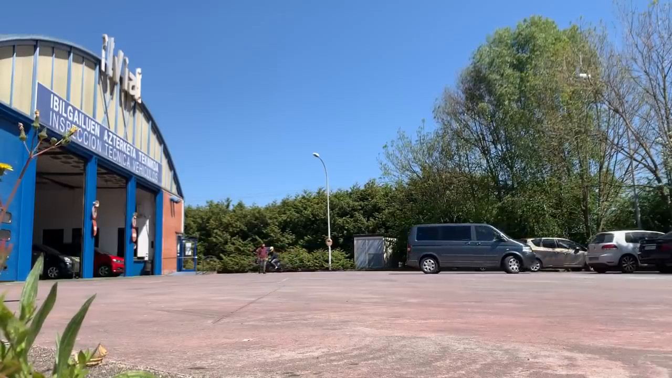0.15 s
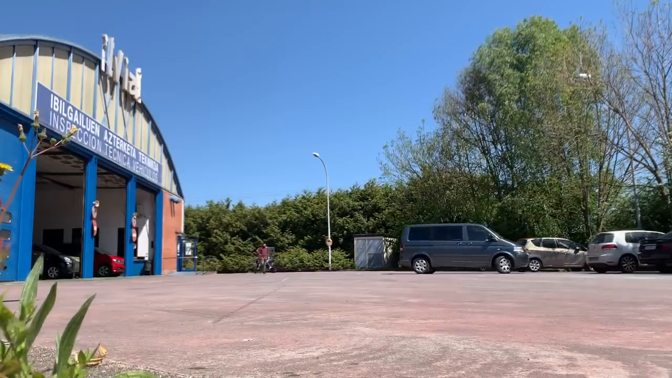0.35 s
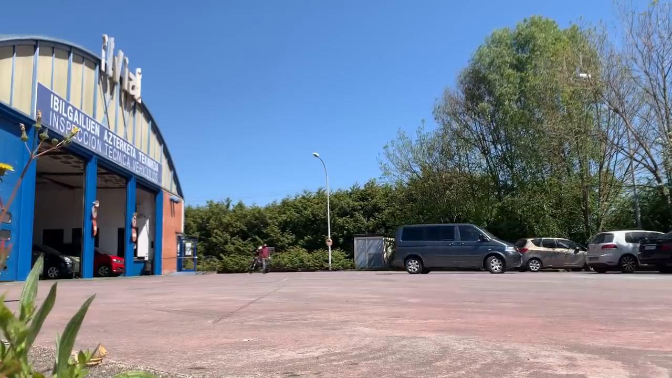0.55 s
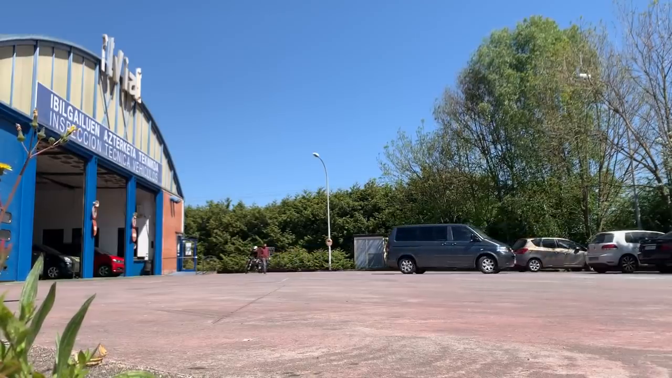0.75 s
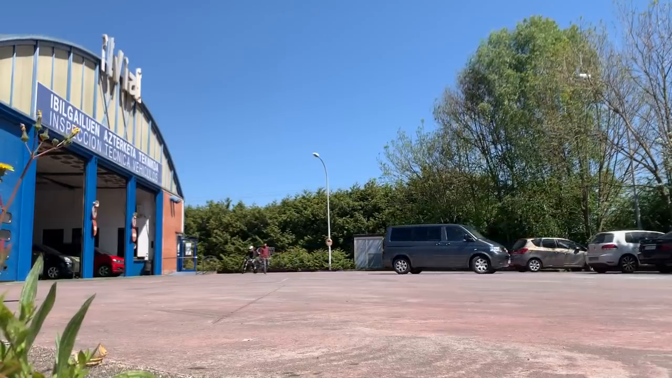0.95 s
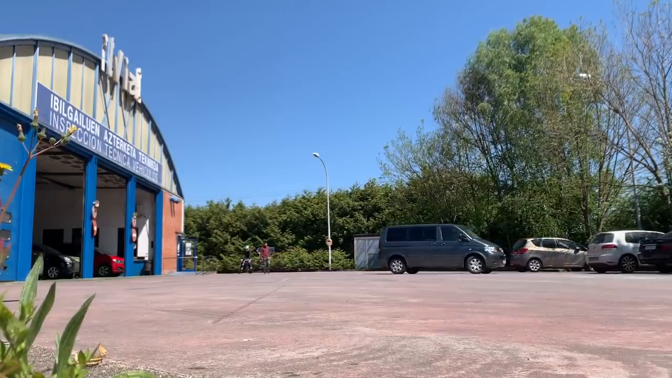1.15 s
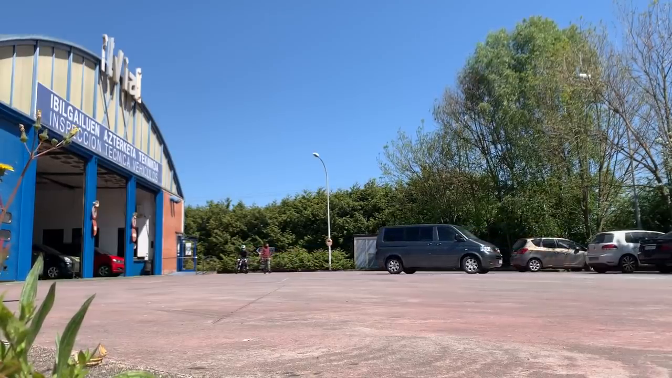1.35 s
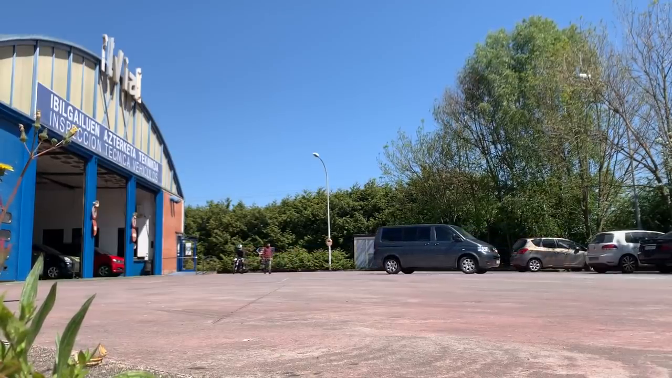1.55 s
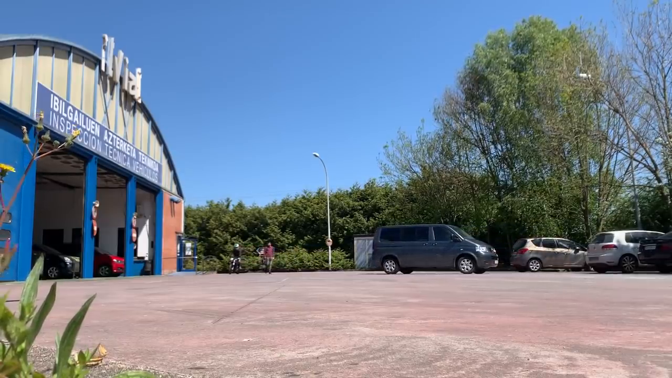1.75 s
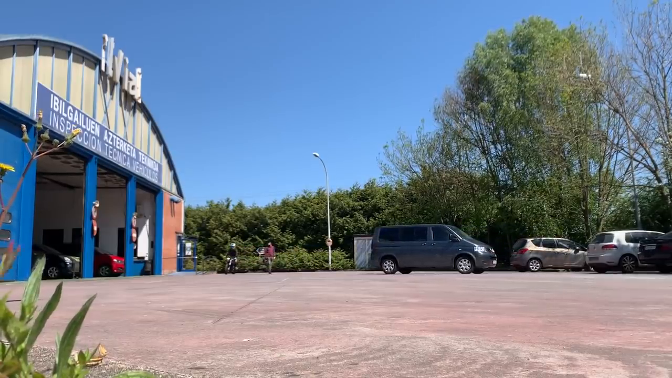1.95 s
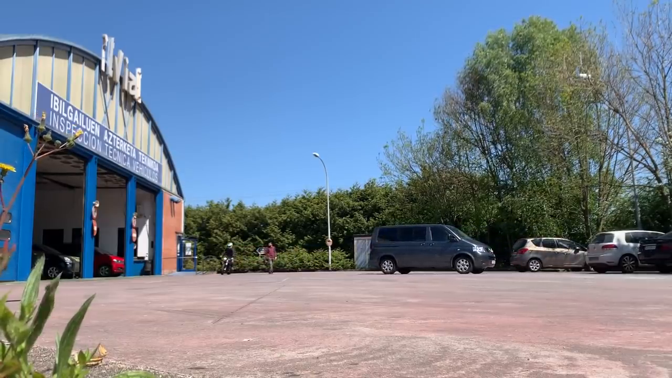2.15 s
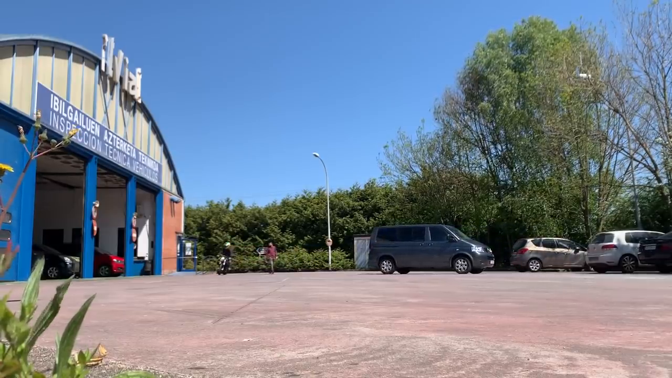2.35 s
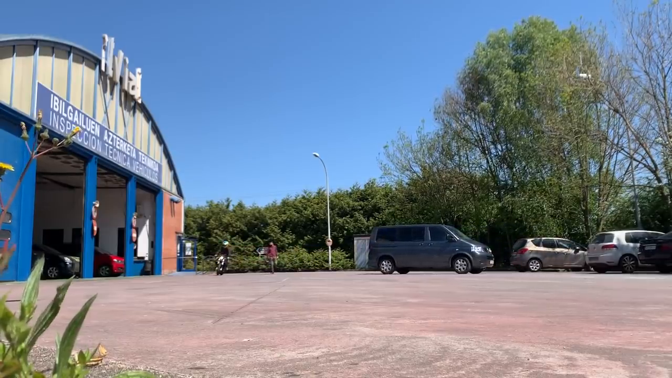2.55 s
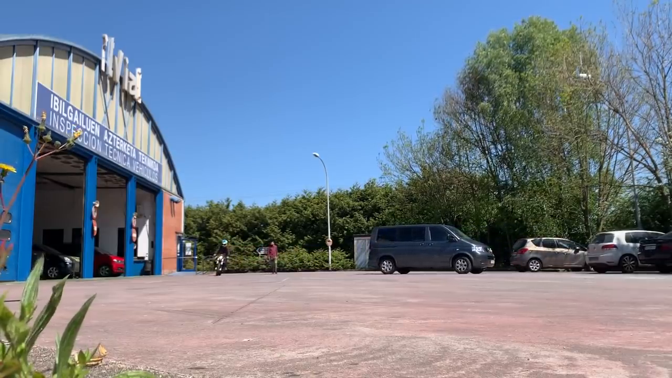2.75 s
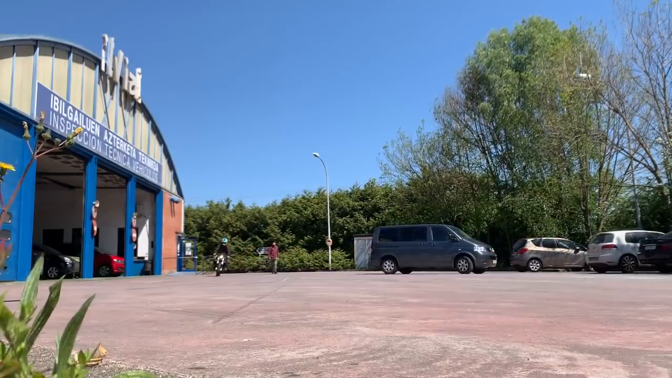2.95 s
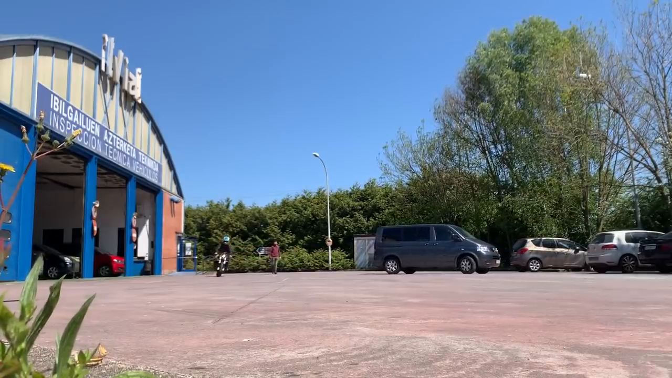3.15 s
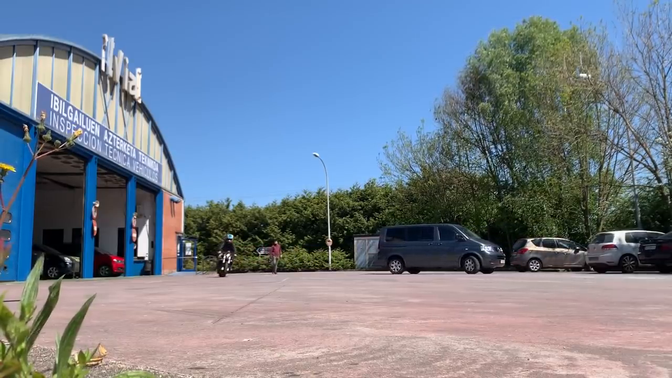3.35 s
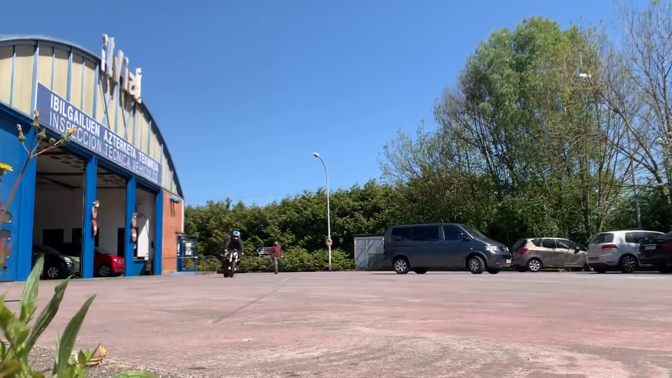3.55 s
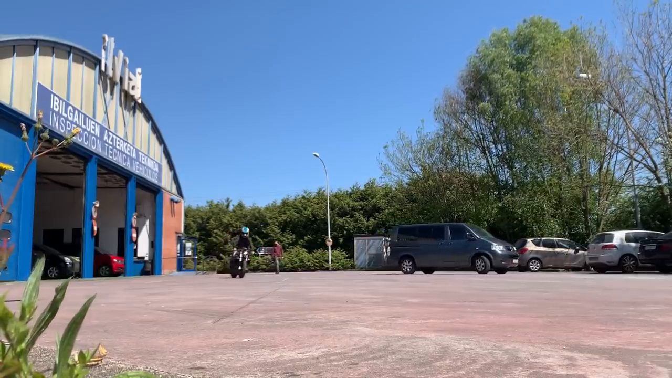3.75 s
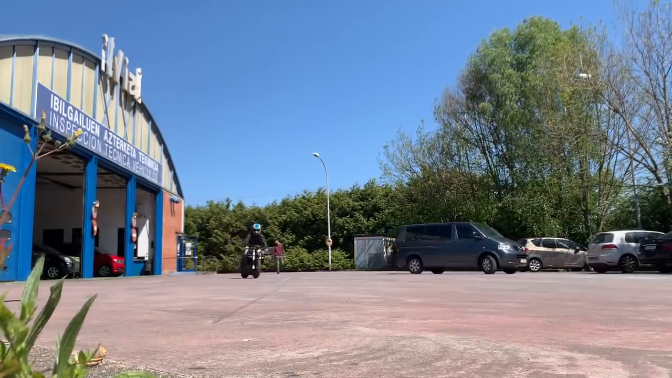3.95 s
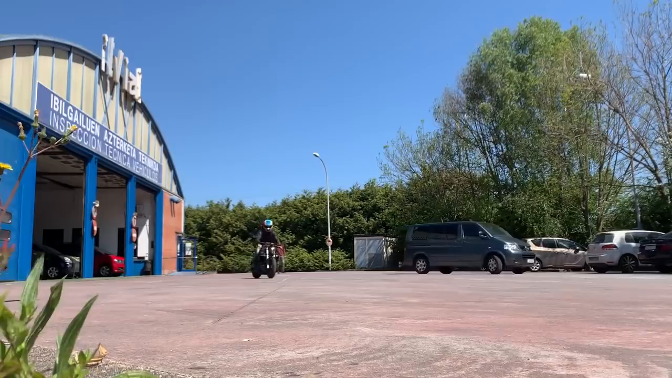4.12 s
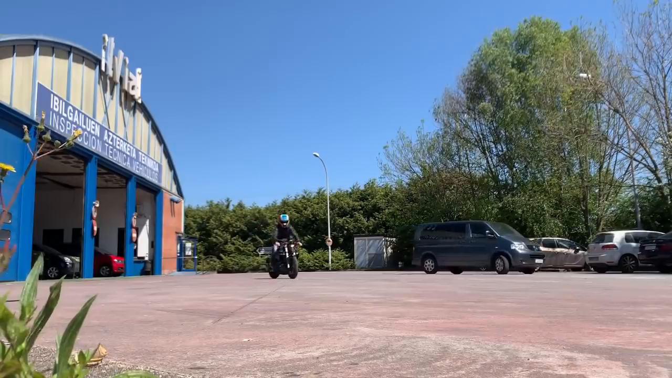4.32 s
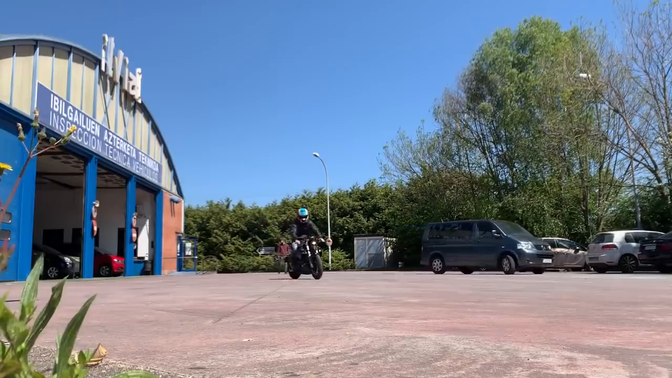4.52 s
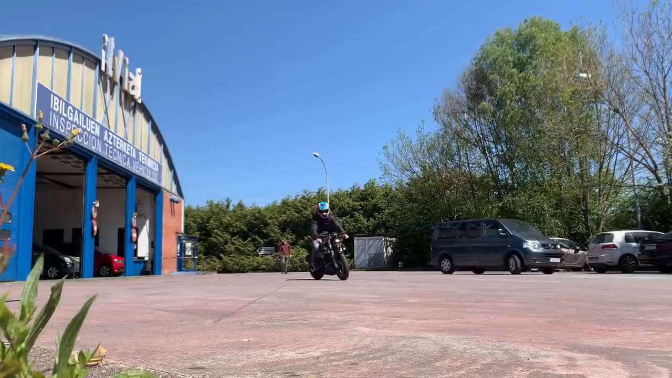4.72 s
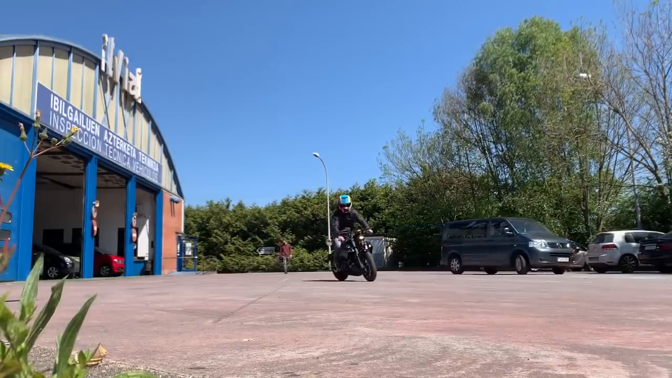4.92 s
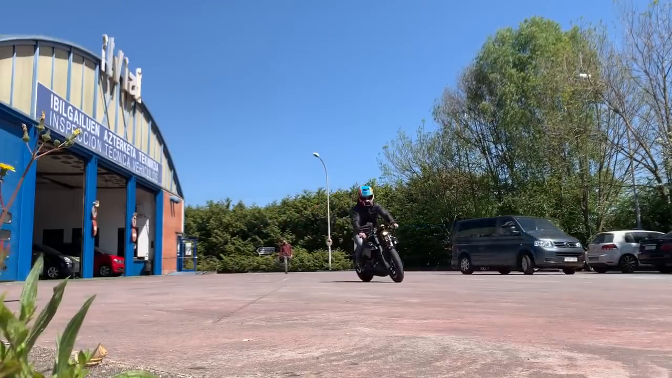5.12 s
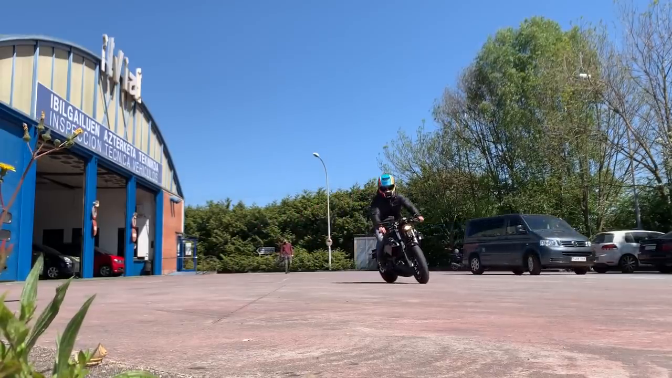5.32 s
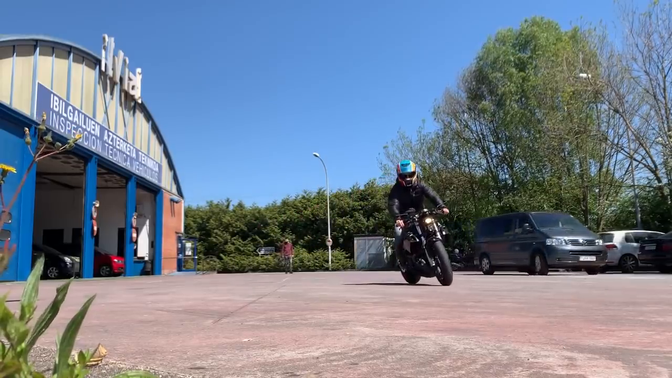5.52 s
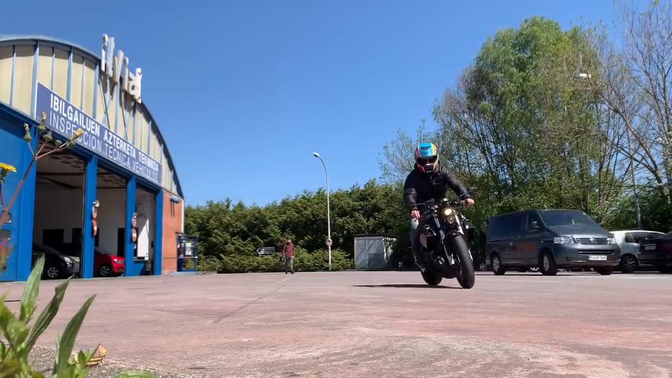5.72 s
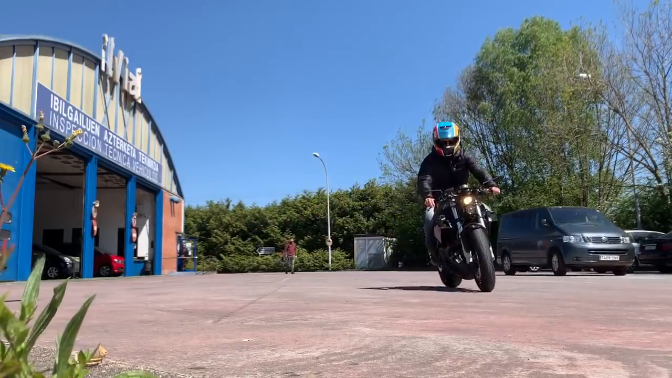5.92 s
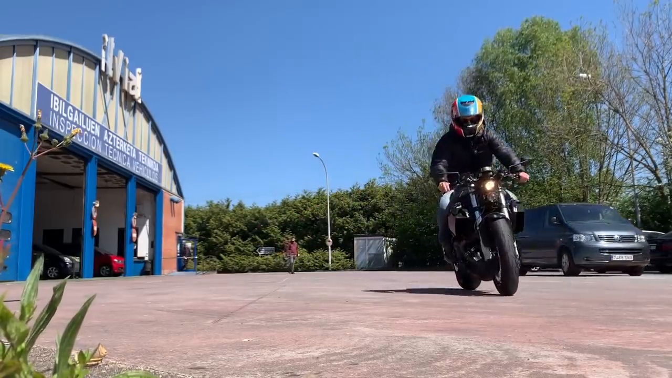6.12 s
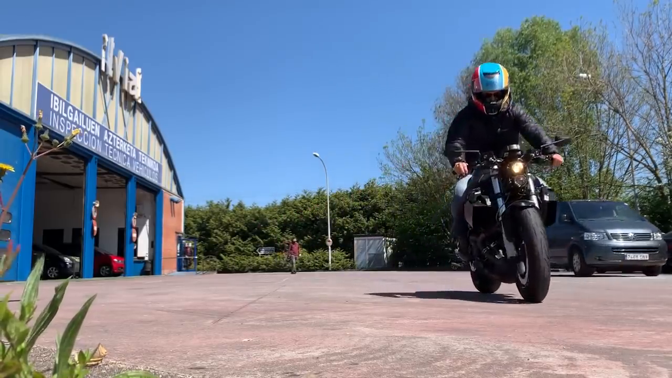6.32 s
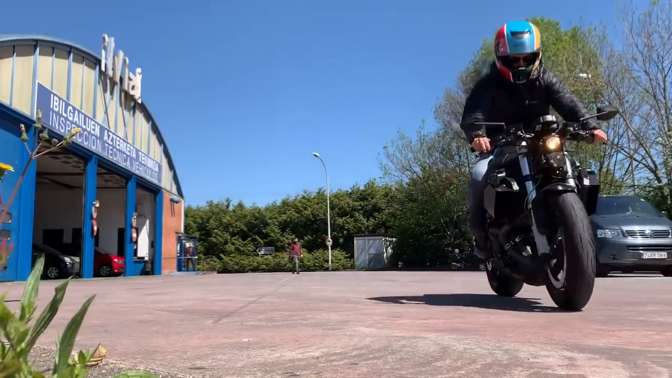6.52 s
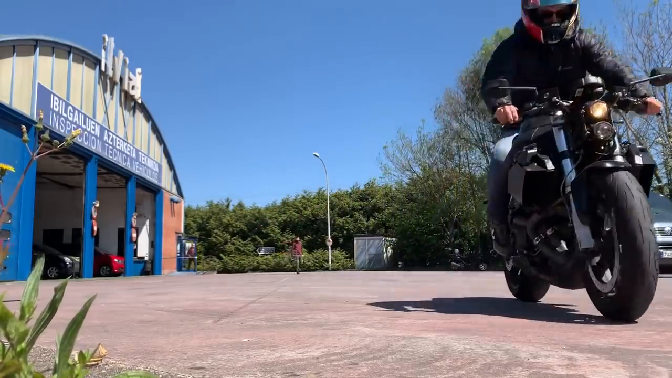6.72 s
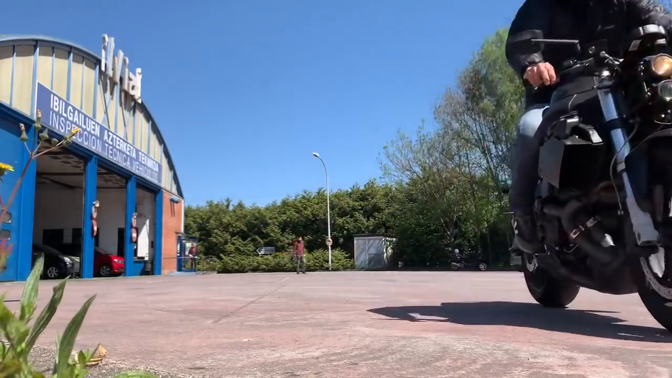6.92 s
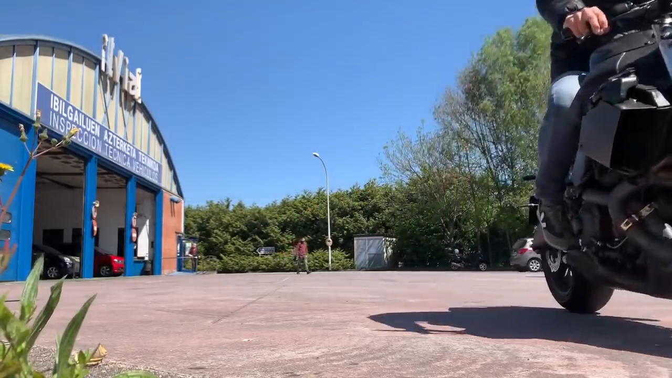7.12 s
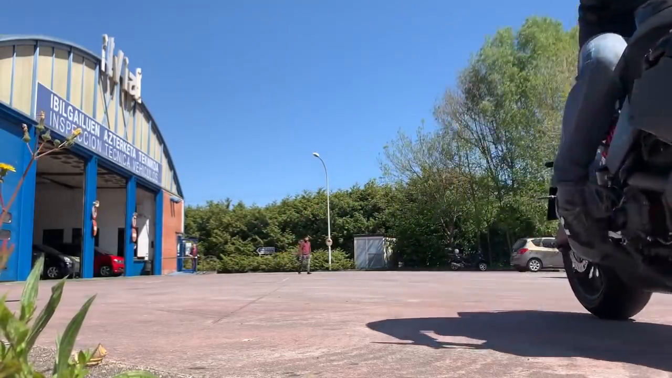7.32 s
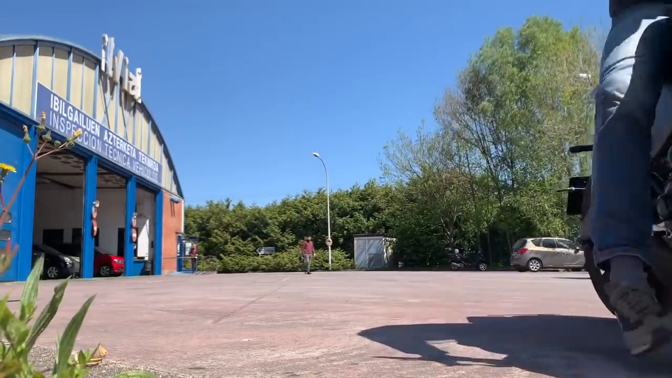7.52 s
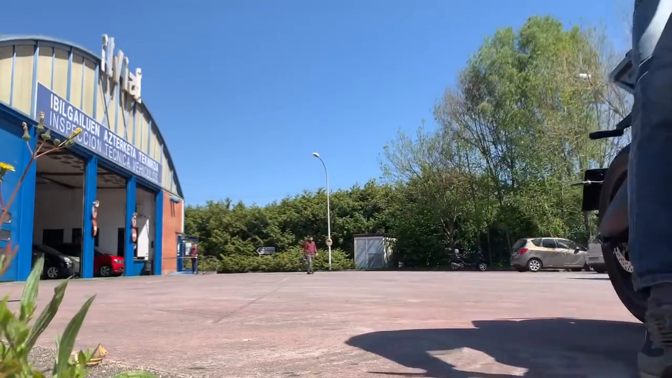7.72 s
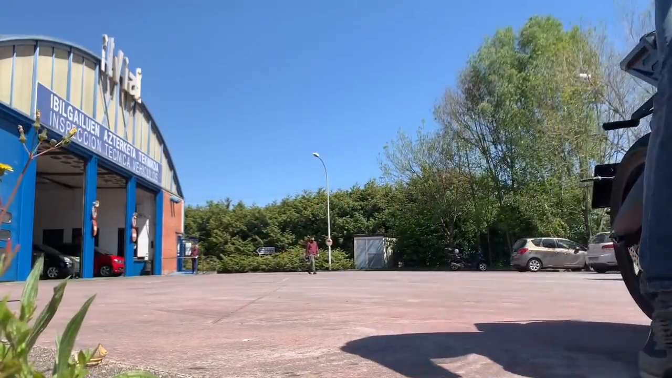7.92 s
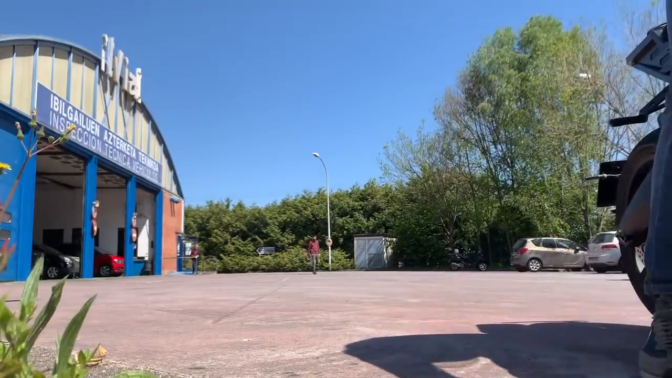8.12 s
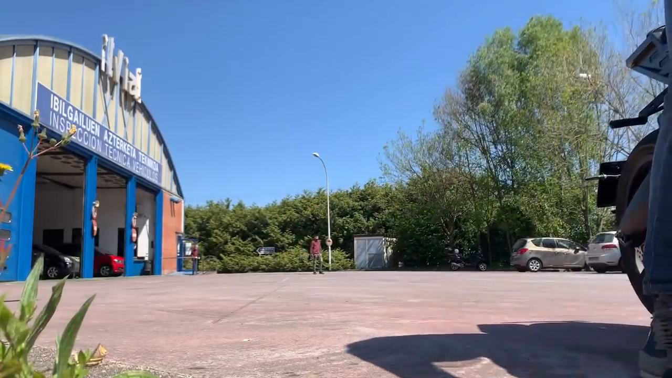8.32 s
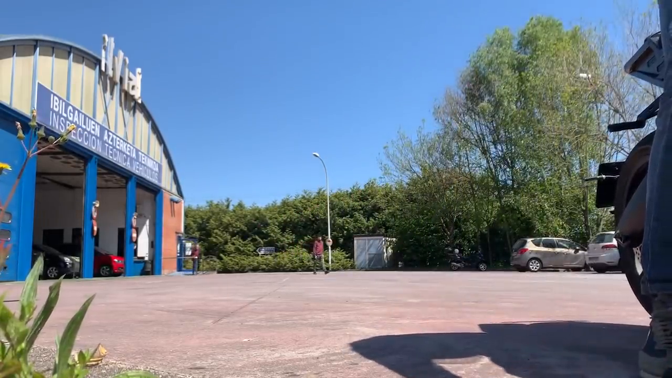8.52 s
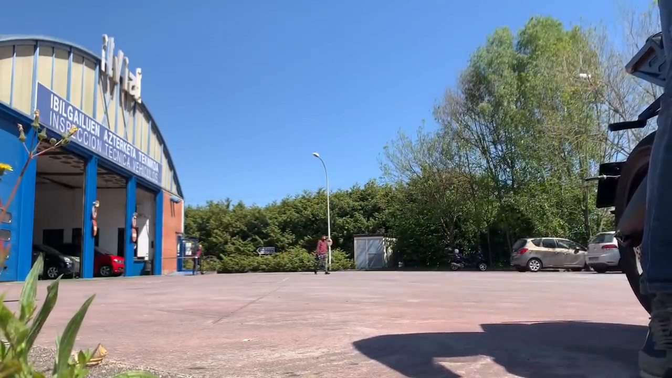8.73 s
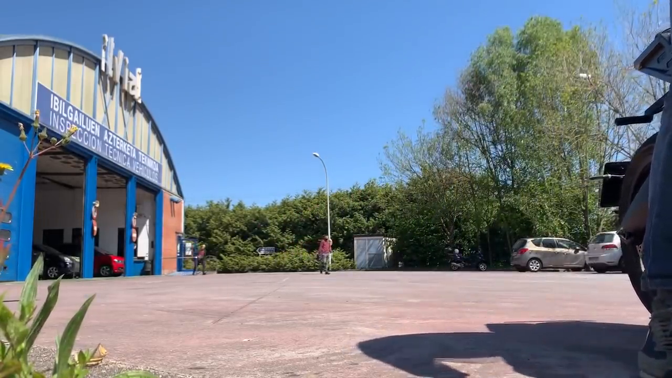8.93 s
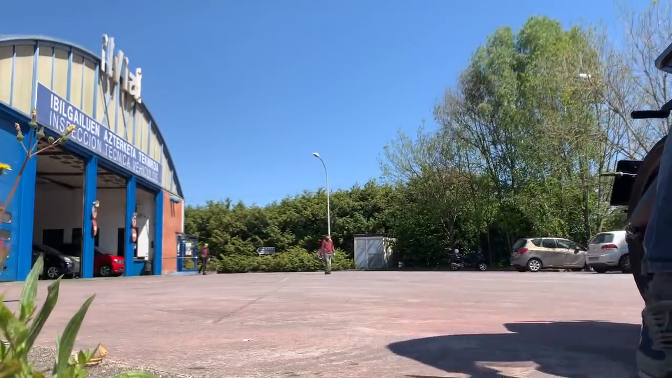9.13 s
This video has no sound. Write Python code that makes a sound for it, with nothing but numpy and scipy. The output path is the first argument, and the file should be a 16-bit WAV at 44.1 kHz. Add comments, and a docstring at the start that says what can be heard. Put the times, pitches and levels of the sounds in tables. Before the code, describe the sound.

In an open paved yard with faint air, a twin-cylinder motorcycle putters about 27 metres off, its low thumps blurred by echo. In the first second a small bird gives falling whistles and another hoarse chirps, thinning out by 2 s. A short throttle pull swells around 1.5-1.8 s and eases. From about 2.5 s revs climb again, peaking near 3.8 s with a rough low boom and slight gear howl; another bird whistles around 3.8-4.1 s. Revs drop by 4.6 s through uneven hard thumps, with chain and tyre hiss and tiny squeaks near 5-5.4 s. From 6 s the engine is close, sliding right: lumpy idle, strong and weak firings alternating around 6.8 s, crisp valve ticking, case rattle, soft whine. Bright clacks multiply after 7 s, with a ping near 7.9 s. It keeps idling a metre away until the end at about 9.2 s.

```python
"""A twin-cylinder motorcycle pulls away at the far end of a paved yard, some 27 m off, rides up to a
microphone near the ground and idles about a metre away with a loping beat. Clicks timed by the crank
ring through silencer filters as thumps; shaped noise makes the crankcase, intake, valves, chain and tyres.
Whine, gear howl and squeaks are tones. The yard echoes the engine; small birds, swept tones with an echo
from the trees, call mostly in the first seconds over faint outdoor air."""
import sys
import numpy as np
from scipy import signal
from scipy.fft import rfft, irfft, next_fast_len
from scipy.io import wavfile
from scipy.ndimage import uniform_filter1d

SR = 44100
rng = np.random.default_rng(int(sys.argv[2]) if len(sys.argv) > 2 else 0)


def transcribe(signal):
    """Save signal, clipped to [-1, 1], as a 16-bit WAV file at the path in sys.argv[1]."""
    frames = np.atleast_2d(signal).T
    limited = np.clip(frames, -1, 1)
    pcm = np.round(limited * 32767).astype(np.int16)
    wavfile.write(sys.argv[1], SR, pcm)


N = 404397
TIME = np.arange(N) / SR
IDLE_RPM = 1500
CROSS_SHARE = .42  # the lead cylinder fires this share of a cycle before the main one

# crank speed, two pulls on the throttle and back to idle: start_s, speed_rpm
CRANK_SPEED = [(0.0, 1284), (0.2, 1495), (0.99, 1495), (1.55, 2493), (1.81, 2476), (2.06, 1776),
               (2.29, 1694), (3.05, 2900), (3.42, 3200), (3.84, 3277), (4.05, 2847), (4.34, 1945),
               (4.65, 1463), (5.43, 1336), (6.27, 1555), (6.97, 1476), (8.05, 1602), (8.27, 1419),
               (8.76, 1476), (9.17, 1624)]


def crank(share):
    """Times at which the four-stroke cycle (two turns) passes a given point, and the cycle numbers."""
    cycles = np.cumsum(curve(CRANK_SPEED)[0]) / (120 * SR)
    number = np.arange(1, int(cycles[-1]) + 2)
    return np.interp(number + share, cycles, TIME, right=N / SR + 1), number


# ride up to the microphone; at first the sound comes round by the cars on the right:
# start_s, bearing (-1 left to 1 right), distance_m
RIDE = [(0, 0.52, 26.7), (1.3, 0.092, 22.6), (1.7, -0.59, 16.6), (2.4, -0.39, 11.8), (3.4, -0.38, 6.7),
        (4.2, -0.4, 7.3), (5.1, 0.082, 6.3), (5.8, 0.19, 4), (6.3, 0.4, 2.46), (7, 0.59, 1.5),
        (7.7, 0.84, 0.93), (8.4, 0.91, 1.17)]


def distance(at=TIME):
    """Metres from the bike to the microphone, never under half a metre."""
    return np.maximum(curve(RIDE, at)[1], .5)


# at idle every other cycle burns harder: start_s, even_over_odd_db
LOPING = [(0, 0), (5.8, 0.5), (6.1, 2), (6.8, 6), (7.1, 1.5), (8, -3.5), (9.17, -1)]
# single firings that burn harder, or almost miss: start_s, extra_db
ODD_FIRINGS = [(.419, 3), (.747, 10), (.822, 8), (.982, 3), (1.931, 10), (1.979, 8), (3.275, 6),
               (3.925, 6.5), (3.963, 3.5), (4.04, 6), (4.08, 6), (4.132, 6.5), (4.771, 4), (5.012, 5),
               (5.296, 4), (5.38, 4.5), (5.469, 3.5), (5.659, 3), (5.741, 1.5), (5.824, 3), (5.903, 4),
               (6.145, -3), (6.225, 3), (6.382, 4), (6.537, 4), (6.61, -1), (6.775, -10), (8.11, -0.5),
               (8.27, -1)]
# what each cylinder's pulse rings with in the silencer: pitch_hz, level_db (relative)
LEAD_SILENCER = [(20, -58), (40, -21.5), (62, 10), (77, -0.5), (90, 3), (125, 5.5), (155, 1), (200, -1),
                 (235, 0.5), (290, -17), (400, -35.5), (900, -47.5), (9000, -101)]
MAIN_SILENCER = [(20, -26.5), (40, -10.5), (62, 2), (77, -2), (97, 3), (125, 1), (165, -4), (220, -34),
                 (300, -15.5), (420, -41.5), (900, -78.5), (9000, -100)]
# brighter crack of a hard firing: pitch_hz, level_db (relative)
CRACK_COLOUR = [(40, -33), (130, 4), (300, -1), (450, -7.5), (900, -26), (4000, -66)]
STUMBLE_S, SETTLED_S = .002, 5.3  # scatter of the firing times, until the idle settles
PIPE_DELAY_S = .006  # from a firing to the top of its thump


def exhaust(lead_db=-2.5, lead_early_s=0.00474, jitter_s=0.0013, bounce=0.27, bounce_s=0.01082,
            ring_db=-2.0, ring_reach_m=4, ring_hz=245, ring_sag_hz_per_s=3200, ring_s=0.01,
            ring_share=0.312, crack_db=-3):
    """Two uneven firings a cycle thump through the silencer; the header rings between, sagging in pitch."""
    main, number = crank(0)
    lead = crank(-CROSS_SHARE)[0]
    main_luck, lead_luck, lead_jitter, ring_jitter, scatter = rng.standard_normal((len(main), 5)).T
    lope_db = curve(LOPING, main)[0] * (-1.) ** number / 2
    # firings differ more as the revs rise
    uneven_db = np.clip(curve(CRANK_SPEED, main)[0] / 600 - 1.7, .8, 3)
    hard_db = sum(db * (abs(main - s) == abs(main - s).min()) for s, db in ODD_FIRINGS)
    stumble = STUMBLE_S * scatter * (main < SETTLED_S)
    for s in [s for s, db in ODD_FIRINGS if db > 0]:  # hard firings keep their own time
        nearest = np.argmin(abs(main - s))
        stumble[nearest] = s - PIPE_DELAY_S - main[nearest]
    main = main + stumble
    lead = lead + stumble - lead_early_s + jitter_s * lead_jitter

    force = amp(lead_db + 0.95 * lope_db + uneven_db * lead_luck + np.minimum(hard_db, 0))
    lead_clicks = clicks(lead, force) + clicks(lead + bounce_s, force * bounce)
    burble = chamber(colour(lead_clicks, LEAD_SILENCER), 150, 1.2)
    main_clicks = clicks(main - .003, amp(lope_db + uneven_db * main_luck + hard_db))
    thump = chamber(colour(main_clicks, MAIN_SILENCER), 120, .5)

    t = TIME[:SR // 10]
    header = t * np.exp(-t / ring_s) * np.sin(2 * np.pi * (ring_hz - ring_sag_hz_per_s * t / 2) * t)
    ring_clicks = clicks(crank(-ring_share)[0] + jitter_s * ring_jitter, force)
    ring = signal.oaconvolve(ring_clicks, header / np.linalg.norm(header))[:N]
    near_ring = amp(ring_db) * np.exp(-distance() / ring_reach_m) * ring

    # hard firings crack only above idle speed
    revving = np.clip(curve(CRANK_SPEED, main)[0] / IDLE_RPM - 1, 0, 1)
    crack = colour(clicks(main, (amp(hard_db) - 1) * revving), CRACK_COLOUR)
    return steady(burble + thump + near_ring + amp(crack_db) * crack)


def chamber(x, hz, quality):
    """A silencer chamber holds back the waves near its own note, so a pulse droops in pitch."""
    return x - 2 * signal.lfilter(*signal.iirpeak(hz, quality, fs=SR), x)


# low booms of the pipe on multiples of the cycle rate:
# middle_s, half_length_s, multiple (of the cycle rate), gain (on the thumps)
PIPE_BOOMS = [(1.71, 0.1, 5, 1.3), (3.367, 0.2, 5, 1.52), (4.02, 0.17, 3, 0.4)]


def boom(waver=0.19):
    """Under way the firings run together into a rough, wavering low note."""
    knots = np.arange(0, 10, .025)
    stumble, swell = (np.interp(TIME, knots, row) for row in rng.standard_normal((2, 400)))
    angle = 2 * np.pi * np.cumsum(curve(CRANK_SPEED)[0]) / (120 * SR) + .07 * stumble
    note = 0
    for s, half, multiple, gain in PIPE_BOOMS:
        note = note + gain * np.exp(-((TIME - s) / half) ** 2) * np.sin(round(multiple) * angle)
    return (1 + waver * swell) * np.sqrt(2) * note


# exhaust come back smeared from distant walls and trees: pitch_hz, level_db (per Hz, relative)
RUMBLE_COLOUR = [(20, -43), (45, -5), (70, 2.5), (105, 3.5), (160, -7), (225, -3.5), (330, -16), (600, -43),
                 (4000, -90)]


def rumble(level_db=-5, db_per_doubling=7, far_m=20):
    """Scattered exhaust sound, as noise that blurs the thumps more the farther the bike is."""
    left, right, both = (steady(colour(rng.standard_normal(N), RUMBLE_COLOUR), size=SR) for _ in range(3))
    gain = amp(level_db + db_per_doubling * np.log2(distance() / far_m))
    return gain * (both + 0.23 * np.array([left, right]))


# the air box: pitch_hz, level_db (per Hz, relative)
AIR_BOX = [(150, -29.5), (270, -4), (350, 0), (480, -4.5), (700, -3.5), (950, -7.5), (1400, -17),
           (4000, -56)]


def intake():
    """Each cylinder gulps air through the air box: noise swelling once a cycle per cylinder."""
    gulps = 1.5 + knocks(early=.5, uneven_db=2, decay_s=.012)
    return colour(gulps * rng.standard_normal(N), AIR_BOX)


def throttle(full_rpm_per_s=1200, lag_s=0.15):
    """The throttle is open while the revs climb: 0-1."""
    climb = np.gradient(curve(CRANK_SPEED, TIME - lag_s)[0]) * SR
    return uniform_filter1d(np.clip(climb / full_rpm_per_s, 0, 1) ** 2, size=12000)


def knocks(early, uneven_db, decay_s):
    """Envelope of unequal blows, one a cycle per cylinder, a share of a cycle ahead of the firing."""
    s = np.concatenate([crank(-early)[0], crank(-early - CROSS_SHARE)[0]])
    strength = amp(uneven_db * np.clip(rng.standard_normal(len(s)), -2, 2))
    blows = fade(clicks(s, strength), decay_s)
    return blows / np.sqrt(np.mean(blows ** 2))


# crankcase and covers: pitch_hz, level_db (per Hz, relative)
CASE_COLOUR = [(120, -13), (260, 2.5), (380, 2.5), (560, 1.5), (760, -1), (860, -1), (980, -2), (1100, 3.5),
               (1400, 2), (1650, -12.5), (1900, -5.5), (2200, -9.5), (4000, -55.5)]
# their modes: pitch_hz, width_hz, level_db (over the body)
CASE_RINGS = [(756, 123, 6.2), (922, 26, 1.7)]
# the large and the small cover: pitch_hz, width_hz
COVER_RINGS = [(972, 46), (1530, 530)]
# covers turn toward the microphone: start_s, large_db, small_db (both against the clatter)
COVER_FACING = [(0, -7.5, -20), (2.5, -8.5, -27), (3.5, -8, -22), (4.4, -7, -14), (5, -16, -17),
                (5.7, -5, -45), (6.4, -2.5, -42), (7, -4.5, -25), (7.5, -9, -7.5), (9.17, -19.5, -9.5)]


def crankcase(whirr=1.86):
    """Piston knocks and whirring gears rattle the case; two covers ring on and on."""
    blows = knocks(early=.28, uneven_db=3, decay_s=.014)
    shake, flex = (whirr + blows) * rng.standard_normal((2, N))
    sound = steady(colour(shake, CASE_COLOUR, CASE_RINGS))
    for (hz, width), db in zip(COVER_RINGS, curve(COVER_FACING)):
        b, a = signal.iirpeak(hz, hz / (2 * width), fs=SR)
        cover = signal.lfilter(b, a, signal.lfilter(b, a, flex))
        sound = sound + amp(db) * steady(cover, size=6000)
    return sound


# cylinder head, then the broad body of the valve train's steel: pitch_hz, level_db (per Hz, relative)
HEAD_COLOUR = [(900, -14), (1700, -4), (2100, 11.5), (2450, 12.5), (2900, 1.5), (3550, 5), (4100, 7.5),
               (4900, 3.5), (5600, -2.5), (7200, -4), (8200, -12), (10000, -71)]
STEEL_COLOUR = [(1200, -29.5), (2300, -12.5), (3500, -2.5), (5000, -7), (7000, 4.5), (10000, -65)]
# steel parts, heard from close by: pitch_hz, width_hz, level_db (over the body)
STEEL_RINGS = [(2450, 60, 15), (2828, 60, 15), (3250, 250, 9), (3580, 380, 11), (4726, 160, 14)]


def valve_gear(rattle_db=1, reach_m=5):
    """Cams rub and valves shut in the cylinder head; close by, the cam chain rattles in bursts."""
    opening = knocks(early=.33, uneven_db=1.5, decay_s=.02)
    shutting = knocks(early=.16, uneven_db=3, decay_s=.006)
    beat = uniform_filter1d(.2 + opening + .25 * shutting, size=130)
    rub = steady(colour(beat * rng.standard_normal(N), HEAD_COLOUR))
    links = rng.standard_normal(N) * (rng.random(N) < 1500 / SR)  # about 1500 random hits a second
    slack = uniform_filter1d(.05 + knocks(early=.33, uneven_db=2, decay_s=.018), size=200)
    rattle = steady(colour(slack * links, STEEL_COLOUR, STEEL_RINGS))
    return rub + amp(rattle_db) * np.exp(-distance() / reach_m) * rattle


# loudest metallic clacks: start_s, level_db (before the common clack level)
LOUD_CLACKS = [(4.23, -43), (6.2522, -33), (6.3614, -32), (6.4078, -32), (6.563, -24), (6.806, -30),
               (6.9695, -24.5), (7.0439, -28), (7.1267, -25), (7.2883, -26), (7.366, -22.5), (7.442, -19),
               (7.6006, -26), (7.677, -24), (7.7548, -21), (7.8201, -20), (7.863, -19), (7.9079, -20),
               (7.9823, -21), (8.2118, -25), (8.297, -22.5), (8.4642, -23), (8.6328, -23.5), (8.667, -21.5),
               (8.7148, -23), (8.7944, -23), (8.8715, -25), (8.9516, -21), (9.1047, -24)]
# a clack is thin and bright: pitch_hz, level_db (per Hz, relative)
CLACK_COLOUR = [(1500, -27), (3500, 7), (5600, 5), (7300, 2), (8100, 13.5), (9000, 7.5), (10500, 2.5),
                (13500, 4.5), (15600, -3)]
# lighter clacks: share of the firings, level at 1 m before the common clack level
CLACK_CHANCE, LIGHT_CLACK_DB = .2, -24


def clacks(level_db=2.5, lag_s=.000293):
    """Slack in the drive is taken up with short bright rattles, a little later on the left."""
    s, db = np.transpose(LOUD_CLACKS)
    firings = np.concatenate([crank(-.16)[0], crank(-.16 - CROSS_SHARE)[0]])
    chosen = rng.random(len(firings)) < CLACK_CHANCE
    light = chosen * amp(LIGHT_CLACK_DB) / distance(firings) ** 2
    blows = amp(level_db) * (clicks(s, amp(db)) + clicks(firings, light))
    swell = uniform_filter1d(fade(blows, .006), size=260)
    rattle = colour(swell * rng.standard_normal(N), CLACK_COLOUR)
    return np.array([np.roll(rattle, round(lag_s * SR)), rattle])


# chain and tyres, then a valve tick: pitch_hz, level_db (per Hz, relative)
SIZZLE_COLOUR = [(3000, -8), (4800, 12.5), (6400, 11.5), (8200, 15.5), (9300, 17), (10200, 15), (12500, 10),
                 (14000, 14), (15600, -17)]
TICK_COLOUR = [(1500, -6), (3500, 6), (5600, -6), (6220, 11), (6700, -9), (7300, -4), (7700, -1),
               (8060, 12), (8800, 7), (10500, 7), (13000, 8), (15600, -11)]
# ringing of the tick: pitch_hz, width_hz, level_db (over the body)
TICK_RINGS = [(6220, 60, 13), (7240, 50, 0), (8700, 73, 15), (10000, 70, 13), (13140, 80, 15)]


def sizzle(tick_db=-4):
    """Fine hiss of chain and tyres, with a soft tick at each firing."""
    blows = knocks(early=.16, uneven_db=3, decay_s=.008)
    ticks = uniform_filter1d(blows, size=120) * rng.standard_normal(N)
    hiss = colour(rng.standard_normal(N), SIZZLE_COLOUR)
    return hiss + amp(tick_db) * colour(ticks, TICK_COLOUR, TICK_RINGS)


def through_air(x, reach_m=8, dull_hz=8000):
    """Distance takes away the highest treble."""
    clear = np.exp(-distance() / reach_m)
    return clear * x + (1 - clear) * signal.filtfilt(*signal.butter(2, dull_hz, fs=SR), x)


# whine, heard only from close by: start_s, level_db (before the echo split)
WHINE_LEVEL = [(5.2, -54), (5.8, -41), (6.76, -32.5), (7.55, -29.5), (8.1, -27.5), (9.17, -33)]
WHINE_HZ = 510.8
WHINE_BEAT_HZ, WHINE_TWIN = 7.7, .45  # a weaker tone lies this far below; its gain


def whine(waver_hz=3, flutter=0.26, upper_db=-15):
    """A whine, perhaps the fuel pump: two multiples of its shaft rate, and a close tone that beats."""
    knots = np.arange(0, 10, .05)
    drift, swell = (np.interp(TIME, knots, row) for row in rng.standard_normal((2, 200)))
    angle = np.pi * np.cumsum(WHINE_HZ + waver_hz * drift) / SR  # shaft at half the whine's pitch
    tone = np.sin(2 * angle) + amp(upper_db) * np.sin(3 * angle)
    twin = WHINE_TWIN * np.sin(2 * angle - 2 * np.pi * WHINE_BEAT_HZ * TIME)
    return amp(curve(WHINE_LEVEL)[0]) * (1 + flutter * swell) * np.sqrt(2) * (tone + twin)


# gears under load: start_s, level_db (before the echo split)
HOWL_LEVEL = [(2.5, -60), (2.9, -45), (3.2, -41), (3.55, -35), (3.7, -47), (4.1, -66), (4.4, -85)]


def howl(width_hz=22, order=29):
    """Meshing gears sing a fuzzy note that follows the crank speed."""
    angle = 2 * np.pi * order * np.cumsum(curve(CRANK_SPEED)[0]) / (120 * SR)
    slow = signal.butter(2, width_hz, fs=SR, output="sos")
    a, b = signal.sosfilt(slow, rng.standard_normal((2, N)))
    return amp(curve(HOWL_LEVEL)[0]) * steady(a * np.cos(angle) + b * np.sin(angle))


# squeaks and pings of metal parts: start_s, length_s, pitch_hz, level_db (before the echo split)
METAL_SQUEAKS = [(5.012, .025, 4600, -41), (5.237, .016, 2700, -38), (5.343, .018, 3600, -41),
                 (5.39, .022, 3780, -36), (7.862, .008, 6220, -24)]


def squeaks(fall=0.04, rough=0.24):
    """Short squeaks as the bike slows, and one ping close by."""
    return sum(bird_note(*row, fall, rough) for row in METAL_SQUEAKS)


def loudness(near_db, distance_db, revs_db, hidden_db):
    """Voice gain: idle level at 1 m, changed per doubling of distance and revs, less behind the workshop."""
    corner_s, corner_length_s = 1.74, 1.52  # the bike comes out from behind the workshop
    hidden = np.clip(1 - (TIME - corner_s) / corner_length_s, 0, 1)
    revs = np.log2(curve(CRANK_SPEED)[0] / IDLE_RPM)
    return amp(near_db - distance_db * np.log2(distance()) + revs_db * revs - hidden_db * hidden)


def split(x, echo_db):
    """Shares a voice between the direct path and the yard: the farther, the more echo."""
    near_db, db_per_doubling = -7.5, 1.7  # echo against direct sound at 1 m, and its gain with distance
    wet = amp(near_db + db_per_doubling * np.log2(distance()) + echo_db)
    return np.array([x, wet * x]) / np.sqrt(1 + wet ** 2)


# a source on the right: pitch_hz, left_minus_right_db
BODY_SHADE = [(60, -2), (200, 0.5), (380, -2), (520, -4), (750, -10.5), (1000, -9), (1300, -1.5),
              (1650, -4), (2400, 1), (4400, -1), (8000, -12.5), (9000, 1.5)]
ECHO_SHIFT_S = 1.728  # time for the scatter pattern to come round


def ports(x, sent):
    """Direct sound at two microphone ports, plus a steadily shifting yard echo of what is sent to it."""
    hz, t, z = signal.stft(x, SR, nperseg=1024)
    bearing, hz = curve(RIDE, t)[0], hz[:, None]
    lag_s, treble_lag_s = .00025, .000293
    # the top octave always comes a little later on the left
    lag = np.where(hz > 7800, treble_lag_s, lag_s * bearing)
    # close by at the side, waves around 430 Hz arrive with a larger delay between the ports
    lag = lag * (1 + 2.8 * bearing ** 4 * np.exp(-((hz - 430) / 260) ** 2))
    half = amp(read(BODY_SHADE, hz) * bearing / 2) * np.exp(-1j * np.pi * hz * lag)
    direct = signal.istft(np.array([z * half, z / half]), nperseg=1024)[1][:, :N]
    shift = 2 * np.pi * TIME / ECHO_SHIFT_S
    echo = 0
    for share in (np.cos(shift), np.sin(shift)):
        echo = echo + signal.oaconvolve((sent * share)[None], yard(), axes=1)[:, :N]
    return direct + echo


# echo of the yard: pitch_hz, decay_s (to -60 dB)
YARD_DECAY = [(60, 0.9), (300, 0.95), (1500, 0.3), (5000, 0.43), (14000, 1)]


def yard():
    """One scatter pattern of walls, cars and hedge at the two ports: sparse random taps that die away."""
    size = (2, SR // 2)
    taps = rng.standard_normal(size) * (rng.random(size) < .05) * (TIME[:SR // 2] > .012)
    hz, t, z = signal.stft(taps, SR, nperseg=256)
    alike = np.clip(0.8 * np.exp(-hz / 900), 0, 1)[:, None]  # long waves are more alike at both ports
    z = np.array([z[0], alike * z[0] + np.sqrt(1 - alike ** 2) * z[1]])
    tail = signal.istft(z * amp(-60 * t / read(YARD_DECAY, hz)[:, None]), nperseg=256)[1]
    return tail / np.linalg.norm(tail[0])


# the treble turns hollow for a moment: start_s, depth (0-1)
HOLLOW_DEPTH = [(4.1, 0), (4.2, 1), (4.75, 0.85), (4.9, 0)]
# where it dips: pitch_hz, width_hz, dip_db
TREBLE_DIPS = [(4060, 440, 10), (7800, 650, 6.6)]


def hollowed(x):
    """Two dips open in the treble for a moment."""
    hz, t, z = signal.stft(x, SR, nperseg=512)
    dips = sum(db * np.exp(-((hz - f) / width) ** 2) for f, width, db in TREBLE_DIPS)
    gain = amp(-dips[:, None] * curve(HOLLOW_DEPTH, t)[0])
    return signal.istft(z * gain, nperseg=512)[1][..., :N]


# one bird's falling whistles: start_s, length_s, pitch_hz (at the start), level_db, fall (share of pitch lost)
BIRD_WHISTLES = [(0.133, 0.11, 8200, -45.5, 0.37), (0.325, 0.12, 7640, -45.5, 0.4),
                 (0.491, 0.04, 6430, -38.5, 0.29), (0.592, 0.036, 6270, -39.5, 0.21),
                 (0.712, 0.036, 5970, -46, 0.18), (3.84, 0.093, 7350, -46, 0.082),
                 (4.032, 0.11, 7000, -51, 0.17)]
# another bird's short hoarse chirps: start_s, pitch_hz (before fall and arch), level_db
BIRD_CHIRPS = [(.053, 5100, -49), (.132, 4200, -54), (.748, 4500, -49), (.79, 4000, -51),
               (1.302, 4830, -50), (1.378, 4200, -52.5), (2.085, 4950, -50.5), (2.165, 4450, -55)]
WHISTLE_ROUGH = 0.16  # 0-1
CHIRP_S, CHIRP_FALL, CHIRP_ROUGH, CHIRP_ARCH = .038, 0.42, 0.5, .3


def birds(echo_db=-9):
    """Two small birds, with a short echo from the trees."""
    song = sum(bird_note(*row, WHISTLE_ROUGH) for row in BIRD_WHISTLES)
    for s, hz, db in BIRD_CHIRPS:
        song = song + bird_note(s, CHIRP_S, hz, db, CHIRP_FALL, CHIRP_ROUGH, CHIRP_ARCH)
    tail = rng.standard_normal((2, SR // 2)) * np.exp(-TIME[:SR // 2] / 0.062)
    echo = signal.fftconvolve(song[None], tail / np.linalg.norm(tail[0]), axes=1)[:, :N]
    return song + amp(echo_db) * echo


def bird_note(s, length, start_hz, db, fall, rough, arch=0):
    """A note that may flick up at first, slides down and ends in a steep hook."""
    u = np.linspace(0, 1, int(length * SR))
    hz = start_hz * (1 - fall * (u + u ** 12) / 2 - arch * (1 - u) ** 6)
    hz = hz * (1 + .5 * rough * uniform_filter1d(rng.standard_normal(len(u)), size=40))
    note = amp(db) * np.sqrt(abs(np.sin(np.pi * u))) * np.sin(2 * np.pi * np.cumsum(hz) / SR)
    return np.pad(note, (int(s * SR), N))[:N]


# the still yard: pitch_hz, level_db (per Hz, relative)
AIR_COLOUR = [(20, -12), (70, -17), (200, -18.5), (500, -8.5), (1000, -30.5), (2000, -26.5), (4500, -35),
              (8000, -48), (11000, -55), (16000, -87)]


def air(level_db=-47):
    """Faint outdoor background: noise that the two ports partly share."""
    left, right, both = (colour(rng.standard_normal(N), AIR_COLOUR) for _ in range(3))
    return amp(level_db) * (np.array([left, right]) + both) / np.sqrt(2)


def amp(db):
    """Decibels to gain."""
    return 10 ** (np.asarray(db) / 20)


def curve(table, at=TIME):
    """The columns of a table of curves at the given times."""
    s, *columns = np.transpose(table)
    return [np.interp(at, s, c) for c in columns]


def read(points, hz):
    """A spectrum joined by lines on a log-frequency axis."""
    f, value = np.transpose(points)
    return np.interp(np.log(hz + 1), np.log(f), value)


def steady(x, size=14400):
    """Holds the running power of a sound near one."""
    power = np.atleast_2d(x ** 2).mean(0)
    smooth = uniform_filter1d(uniform_filter1d(power, size), size // 2)
    return x / np.sqrt(abs(smooth) + 1e-14)


def colour(x, points, modes=(), size=16384):
    """Causal filter of unit energy from a spectrum with resonances on top."""
    hz = abs(np.fft.fftfreq(size, 1 / SR))
    gain = amp(read(points, hz))
    for f, width, db in modes:
        gain = gain * np.sqrt(1 + amp(db) ** 2 / (1 + (2 * (hz - f) / width) ** 2))
    minimum_phase = np.exp(np.conj(signal.hilbert(np.log(gain))))
    ring = np.fft.ifft(minimum_phase).real[:size // 2]
    return signal.oaconvolve(x, ring / np.linalg.norm(ring))[:N]


def clicks(s, gain):
    """A train of clicks at the given times."""
    return np.bincount(np.clip(s * SR, 0, N).astype(int), gain * (s > 0), N + 1)[:N]


def fade(x, seconds):
    """Gives each click an exponential tail."""
    return signal.lfilter([1], [1, -np.exp(-1 / (seconds * SR))], x)


# how hard the firings burn; they weaken and swell again as the throttle shuts: start_s, level_db (relative)
BURN_LEVEL = [(0, 0), (.6, -0.5), (1, 2.5), (1.2, -0.5), (2.2, -1), (2.55, -3), (2.76, -1), (3.1, -6.5),
              (3.4, -3.5), (3.75, -7), (4.08, 0.5), (4.26, -8.5), (4.65, -6), (4.8, -1), (5.15, -4),
              (5.4, 0.5), (6.1, -3), (6.5, -2), (7.3, -1.1), (7.9, -2.5), (8.6, -1.5)]
# extra hiss of chain and tyres while the bike slows: start_s, level_db (relative)
SLOWING_HISS = [(3.72, -22), (3.9, -15.5), (4.25, -3.5), (4.7, 2.5), (5.05, -3), (5.8, -3), (6.25, -10.5)]


def scene():
    """The voices of the engine along the ride, in the yard, with birds and air."""
    pipe = loudness(near_db=-10.0, distance_db=5.0, revs_db=4.5, hidden_db=1.0) * amp(curve(BURN_LEVEL)[0])
    case = loudness(near_db=-20.5, distance_db=3.5, revs_db=-0.5, hidden_db=3.5)
    roar = loudness(near_db=-18.0, distance_db=4.5, revs_db=1.5, hidden_db=13) * throttle()
    head = loudness(near_db=-26.0, distance_db=5.0, revs_db=-2.0, hidden_db=9.0)
    fine = loudness(near_db=-22.5, distance_db=7.5, revs_db=10.0, hidden_db=0) * amp(curve(SLOWING_HISS)[0])
    thumps = steady(ports(*split(exhaust(), echo_db=0.5)) + boom() + rumble())
    clatter = split(case * steady(crankcase()), echo_db=0.5)
    clatter = clatter + split(roar * steady(intake()), echo_db=-1)
    clatter = clatter + split(head * steady(valve_gear()), echo_db=9.0)
    clatter = clatter + split(fine * through_air(steady(sizzle())), echo_db=-42.0)
    clatter = clatter + split(whine() + howl() + squeaks(), echo_db=-13)
    return pipe * thumps + hollowed(ports(*clatter)) + clacks() + birds() + air()


# the two microphone ports differ in phase: pitch_hz, left_lead_rad
PORT_LEAD = [(1400, 0), (1650, 3.14), (1890, 5.6), (2400, 5.6), (2950, 5.2), (3500, 6.1), (4500, 6.28)]
# and in level: pitch_hz, left_minus_right_db
PORT_LEVEL = [(1300, -1), (1500, 6.5), (1750, 1.5), (2800, -1.5), (5000, -1), (6500, -0.5), (8000, -0.5)]


def microphones(x):
    """Each port has its own phase and colour."""
    size = next_fast_len(N + 4096)
    hz = np.fft.rfftfreq(size, 1 / SR)
    half = amp(read(PORT_LEVEL, hz) / 2) * np.exp(.5j * read(PORT_LEAD, hz))
    return irfft(rfft(x, size) * np.array([half, 1 / half]), size)[:, :N]


def record(dry):
    """The recorder hears through two ports, rounds off the highest peaks and limits the band."""
    heard = microphones(dry)
    knee, edge_hz = .68, 15800
    over = np.maximum(abs(heard) - knee, 0)
    soft = np.clip(heard, -knee, knee) + np.sign(heard) * .3 * np.tanh(over / .3)
    lowpass = signal.firwin(511, edge_hz, window=("kaiser", 9), fs=SR)
    return signal.oaconvolve(soft, lowpass[None], "same")


dry = scene()
out = record(dry)
transcribe(out)
```